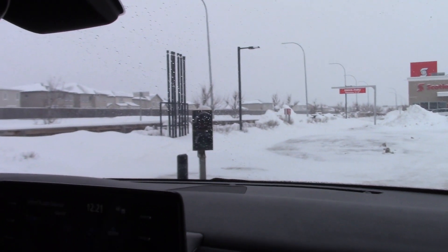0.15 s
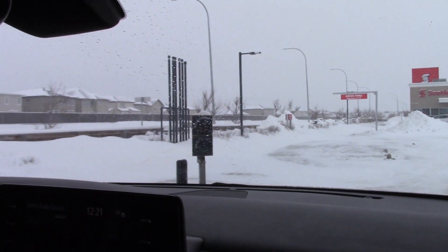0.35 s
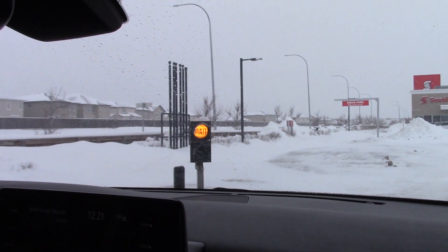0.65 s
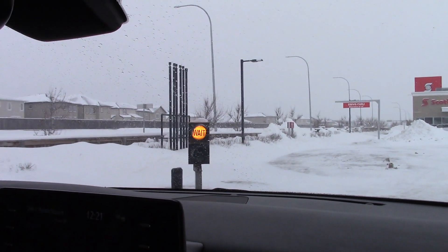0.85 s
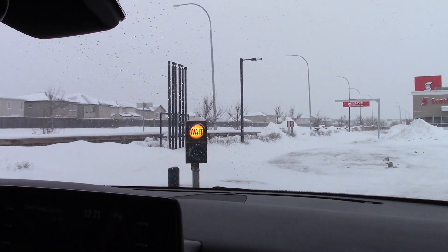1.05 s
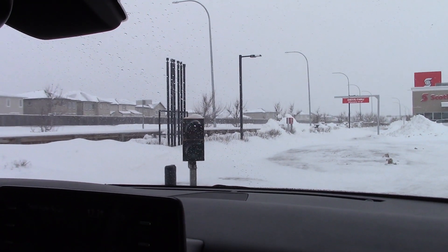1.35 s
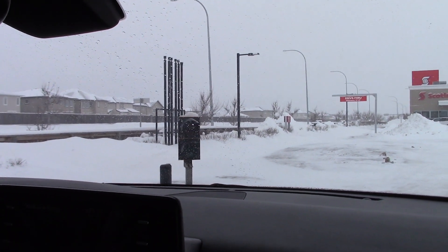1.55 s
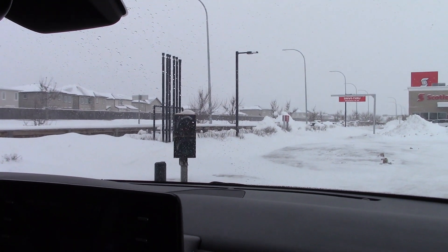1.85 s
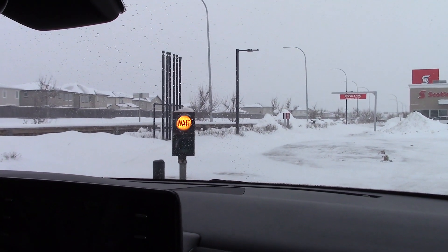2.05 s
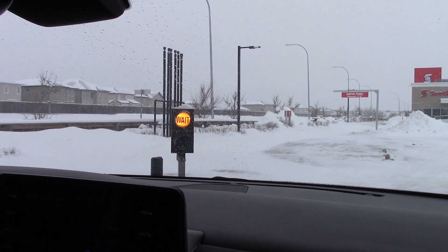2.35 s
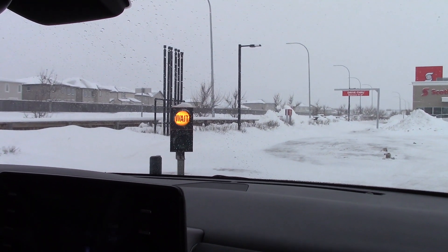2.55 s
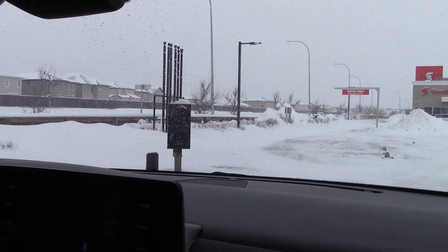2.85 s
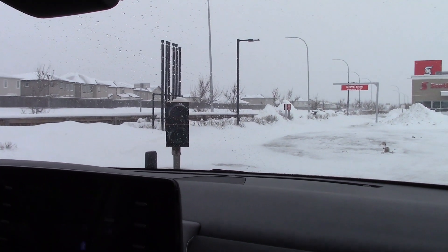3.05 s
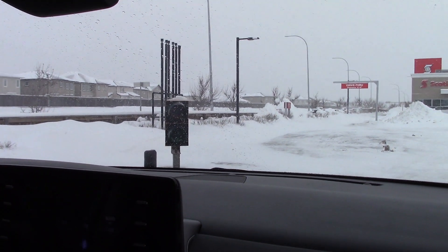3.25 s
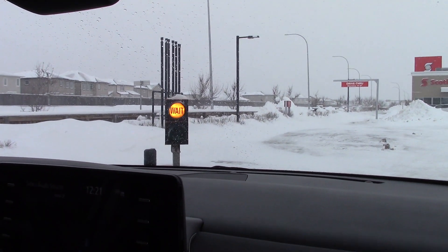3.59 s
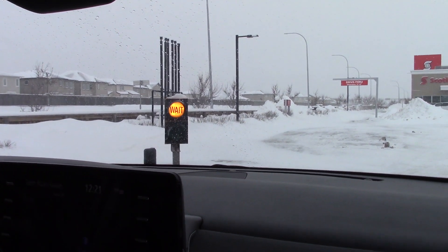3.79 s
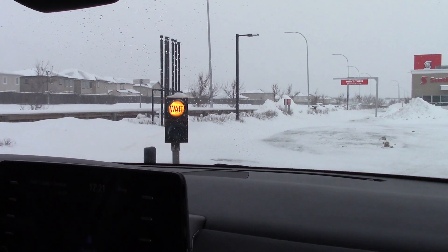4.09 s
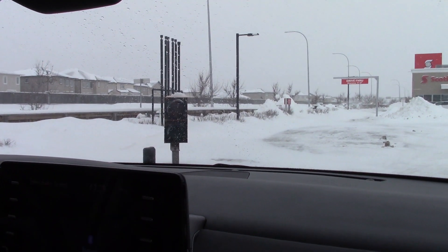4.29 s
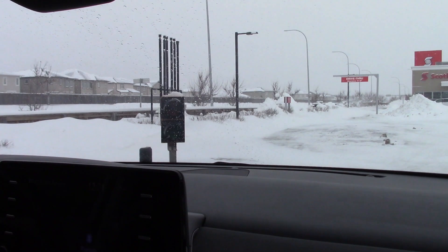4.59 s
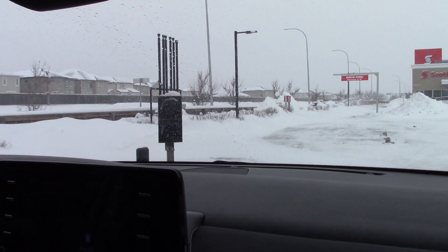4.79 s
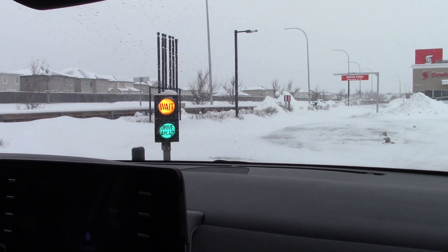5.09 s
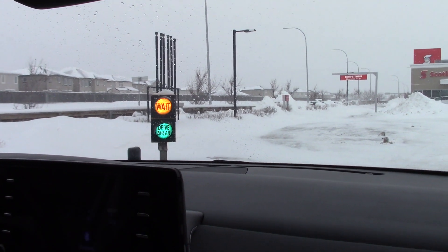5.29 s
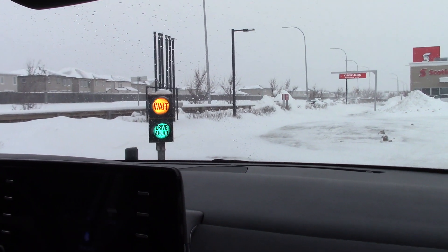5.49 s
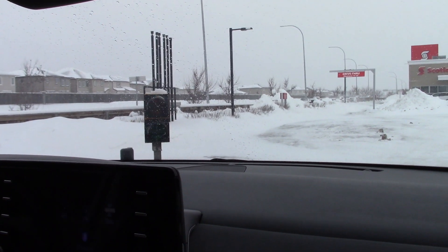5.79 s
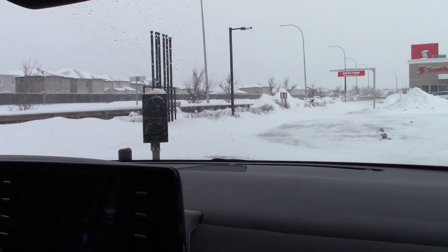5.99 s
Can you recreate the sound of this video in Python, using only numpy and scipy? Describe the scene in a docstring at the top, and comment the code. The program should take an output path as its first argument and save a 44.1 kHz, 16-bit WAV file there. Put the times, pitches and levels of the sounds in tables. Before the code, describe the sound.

Continuous blower noise with no start or stop, captured by a microphone in the car cabin. Low buffeting and a muffled roar lie under a fluttering, nearly pure fan hum and a booming drone of slightly wandering pitch. Hiss of air and spray is brightest at first, then thins as the glass dries. A faint breathy whistle fades in the first second; small water drops tick sparsely on the windshield.

```python
"""In a car wash, inside a car that stands under the dryer blowers.
Turbulent air, shaped noise, roars on the body; a narrow drone, a sine of wandering pitch, booms in the cabin.
The fans add a hum and a thin whine, both nearly pure tones. Bright noise hisses over the glass,
a few drops tick on it, an edge sings faintly at first, and a limiter holds down the peaks.
Levels and spectra in the tables are relative: trims, normalisation and the limiter act on them later."""
import sys
import numpy as np
from scipy import signal
from scipy.fft import rfft, irfft
from scipy.io import wavfile
from scipy.ndimage import uniform_filter1d, minimum_filter1d

SR = 44100
rng = np.random.default_rng(int(sys.argv[2]) if len(sys.argv) > 2 else 0)


def pcm_store(signal):
    """Save signal as 16-bit PCM."""
    levels = np.round(np.clip(np.atleast_2d(signal), -1, 1) * 32767)
    wavfile.write(sys.argv[1], SR, levels.astype(np.int16).T)


N = 270774
TIME = np.arange(N) / SR  # [s]
BINS = np.fft.rfftfreq(N, 1 / SR)  # [Hz]


def amp(db):
    """Logarithmic level: decibels become an amplitude ratio."""
    return 10 ** (np.asarray(db) / 20)


def unit(x):
    """Normalisation: scales a signal to an rms of 1."""
    return x / np.sqrt(np.mean(x ** 2) + 1e-20)


def level_curve(rows):
    """Linear interpolation: a (time, level) table read at every sample."""
    times, levels = np.transpose(rows)
    return np.interp(TIME, times, levels)


def spectrum(points):
    """Log-frequency interpolation: a spectrum table read in dB at every bin."""
    hz, db = np.transpose(points)
    return np.interp(np.log(BINS + 1), np.log(hz + 1), db)


def noise(gain):
    """Spectral shaping: white noise weighted bin by bin, then set to an rms of 1."""
    white = rng.standard_normal(N)
    return unit(irfft(rfft(white) * gain, N))


def wander(rate_hz):
    """Slow random fluctuation: noise of rms 1 that is weak above the rate."""
    without_drift = BINS / (BINS + 1)
    slow = 1 / (1 + (BINS / rate_hz) ** 2)
    return noise(without_drift * slow)


def split(x, hz):
    """Complementary filtering: the parts below and above a frequency, which sum to the whole."""
    low = irfft(rfft(x) / (1 + (BINS / hz) ** 6), N)
    return low, x - low


def tone(hz, stray_hz, stray_rate_hz):
    """Frequency modulation: an rms-1 sine whose pitch is pushed about by the moving air."""
    pitch_hz = hz + stray_hz * wander(stray_rate_hz)
    phase = 2 * np.pi * np.cumsum(pitch_hz) / SR
    return np.sqrt(2) * np.sin(phase)


# what differs between the two channels: (frequency [Hz], density [dB per Hz])
CHANNEL_DIFFERENCE = [(20, -25), (70, -22), (130, -7), (330, 8), (600, 2), (1200, -18), (2600, -15.5),
                      (5000, -34), (10000, -56.5), (16000, -71.5)]


def channel_difference(level_db=-41.0):
    """Sum and difference: a faint noise to be added to one channel and taken from the other."""
    return amp(level_db) * noise(amp(spectrum(CHANNEL_DIFFERENCE)))


# drops and spurts of spray on the glass: (time [s], level [dB], 60 dB decay time [s])
DROPS = [(.196, -39, .02), (.22, -44, .02), (0.689, -25.5, 0.01), (1.032, -33.5, .15), (1.335, -37, 0.1),
         (1.872, -37, 0.06), (1.907, -36, 0.043), (2.048, -40, .1), (2.128, -37, .05), (3.205, -38, 0.088),
         (3.345, -37, .04), (3.63, -43, .08), (4.598, -35, .025), (5.695, -39, .06), (5.73, -40, .03)]
# ring of a drop on the glass: (frequency [Hz], density [dB per Hz])
GLASS_RING = [(1500, -11.5), (4000, 7), (7500, -2.5), (10000, -13), (15000, -22)]


def drops(tick_db=7, tick_s=0.00079, onset_s=0.0002):
    """Impact excitation: each drop is a crisp tick and a decaying splash of bright noise."""
    envelope = np.zeros(N)
    for start_s, level_db, t60_s in DROPS:
        age = np.maximum(TIME - start_s, 0)
        onset = 1 - np.exp(-age / onset_s)
        splash = amp(-60 * age / t60_s)
        tick = amp(tick_db) * np.exp(-age / tick_s)
        envelope += onset * amp(level_db) * (splash + tick)
    return envelope * noise(amp(spectrum(GLASS_RING)))


# air singing over an edge: one row of (frequency [Hz], half-width at 1/e gain [Hz],
# level [dB], time to fade to 1/e [s])
EDGE_SONG = (2619, 219, -37, 0.6)


def edge_song():
    """Edge tone: a breathy, narrow band of noise that soon dies away."""
    hz, width_hz, level_db, fade_s = EDGE_SONG
    band = noise(np.exp(-((BINS - hz) / width_hz) ** 2))
    fade = np.exp(-(TIME / fade_s) ** 4)
    return amp(level_db) * fade * band


# air scouring the glass: (frequency [Hz], density [dB per Hz])
HISS_SPECTRUM = [(500, -5), (1000, 2.5), (1400, 2), (1850, 0.9), (2200, -1.5), (2650, -1.25), (3150, -5),
                 (3550, -7.5), (4300, -12.5), (5300, -17), (6900, -22.5), (8500, -29), (11000, -38),
                 (15500, -51.5)]
# force of the air that sweeps the glass: (time [s], level [dB])
SCOUR = [(0, -30), (0.25, -27.5), (0.55, -29.0), (0.8, -28.0), (1.5, -29), (2.25, -28), (2.7, -29),
         (3.25, -27.0), (3.45, -29.5), (3.63, -27), (3.85, -27.5), (4.7, -27), (4.95, -28), (5.6, -27),
         (5.8, -29), (6.14, -28)]
# extra spray while the glass is wet [dB], and the time constant of its drying [s]
WET_DB, DRYING_S = 4.5, 2.7


def hiss(trim_db=2.5, gust_db=0.5, gust_hz=18, top_db=-1.36, top_flicker_db=0.46):
    """Turbulent flow noise: gusts move the hiss; its top, fine spray, also flickers and thins in drying."""
    low, top = split(noise(amp(spectrum(HISS_SPECTRUM))), 3200)
    drying_db = WET_DB * np.exp(-TIME / DRYING_S)
    spray_db = top_db + drying_db + top_flicker_db * wander(30)
    force_db = level_curve(SCOUR) + trim_db + gust_db * wander(gust_hz)
    return (low + top * amp(spray_db)) * amp(force_db)


# swells of the cabin drone: (time [s], level [dB])
BOOM_LEVEL = [(0, -25.5), (.45, -14), (.8, -20), (1.25, -12.5), (2.15, -23), (2.75, -15.5), (3.2, -26),
              (3.85, -11.5), (4.1, -24), (4.4, -11.5), (4.85, -24), (5.2, -15.5), (6.14, -17.5)]


def boom(swing=0.23, swing_hz=9):
    """Cabin drone: a narrow, unsteady tone under amplitude and frequency modulation."""
    unsteadiness = 1 + swing * wander(swing_hz)
    return amp(level_curve(BOOM_LEVEL)) * unsteadiness * tone(345, stray_hz=7.47, stray_rate_hz=10.16)


# blade tone of the fans, which comes forward in swells: (time [s], level [dB])
HUM_LEVEL = [(0, -23.5), (0.3, -21.5), (0.65, -35), (1, -27.5), (1.5, -27.5), (2.05, -27), (2.4, -17),
             (3, -26), (3.3, -29.5), (3.9, -18.5), (4.35, -23.0), (4.6, -29), (4.85, -18), (5.7, -19),
             (6.14, -21.5)]
# thin motor whine: (time [s], level [dB])
WHINE_LEVEL = [(0, -48.5), (1.2, -34), (1.6, -45.5), (3, -40.5), (4.5, -46.5), (6.14, -62)]


def fans(blade_hz=589.3, third_db=-27, hum_trim_db=2.5, flutter=0.28, flutter_hz=9):
    """Blade-passing tone: a fluttering hum with a faint third harmonic, beside the motor whine."""
    fundamental = tone(blade_hz, stray_hz=0.7, stray_rate_hz=8)
    third = amp(third_db) * tone(3 * blade_hz, stray_hz=8, stray_rate_hz=15)
    hum_level = amp(level_curve(HUM_LEVEL) + hum_trim_db) * (1 + flutter * wander(flutter_hz))
    whine = amp(level_curve(WHINE_LEVEL)) * tone(1501, stray_hz=2.1, stray_rate_hz=22)
    return hum_level * (fundamental + third) + whine


# air on the car body, as it comes through to the cabin: (frequency [Hz], density [dB per Hz])
ROAR_SPECTRUM = [(15, -43.5), (28, -36), (52, -15), (75, -10), (105, -2.5), (145, -1), (190, -4), (250, 1),
                 (340, 3), (465, 0), (520, -6), (660, -11.5), (1100, -21), (1700, -49.5), (6000, -90.5)]
# broad resonances of panels and cabin: (frequency [Hz], half-width at e^-2 of the lift [Hz], lift [dB])
PANELS = [(115.4, 15, 4), (150.2, 18, 2), (441.4, 16, 3.5), (583, 51, 6), (718, 46, 6.5), (906, 123, 6.5),
          (1012, 41, 3), (1189, 72, 12)]
# low buffeting, which swells early and then eases: (time [s], level [dB])
BUFFET_LEVEL = [(0, -17), (1.3, -14), (3.1, -16.5), (4.1, -15), (5, -18.5), (6.14, -16.5)]


def roar(body_db=-10.0, gust_db=0.5, buffet_gust_db=1.6):
    """Forced vibration: turbulence shakes the panels steadily; low buffeting swells apart from the rest."""
    lift_db = sum(lift * np.exp(-2 * ((BINS - hz) / width) ** 2) for hz, width, lift in PANELS)
    low, body = split(noise(amp(spectrum(ROAR_SPECTRUM) + lift_db)), 199)
    buffet = unit(low) * amp(level_curve(BUFFET_LEVEL) + buffet_gust_db * wander(3))
    return buffet + unit(body) * amp(body_db + gust_db * wander(29))


def scene():
    """Superposition: every source reaches both channels alike, but for a faint difference."""
    side = channel_difference()
    cabin = drops() + edge_song() + hiss() + boom() + fans() + roar()
    return np.array([cabin + side, cabin - side])


def record(dry, drive_db=0.8, ceiling_db=-1.26, recovery_db_per_s=300, band_limit_hz=15700):
    """Peak limiting: gain ducks at once on each peak and soon recovers; then a low-pass band limit."""
    loud = dry * amp(drive_db)
    peak_db = 20 * np.log10(abs(loud).max(0) + 1e-9)
    over_db = np.maximum(peak_db - ceiling_db, 0)
    # a running maximum on a rising ramp makes the ducking recover at a constant rate
    ramp_db = TIME * recovery_db_per_s
    duck_db = np.maximum.accumulate(over_db + ramp_db) - ramp_db
    # the gain is widened around each peak [samples], then smoothed
    gain = uniform_filter1d(minimum_filter1d(amp(-duck_db), size=61), size=61)
    low_pass = signal.firwin(511, band_limit_hz, window=("kaiser", 9), fs=SR)
    return signal.oaconvolve(loud * gain, low_pass[None], "same")


dry = scene()
out = record(dry)
pcm_store(out)
```